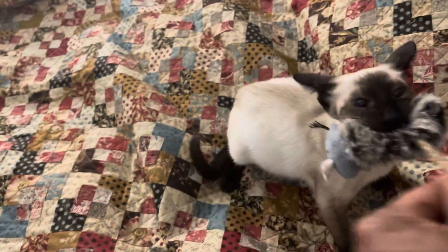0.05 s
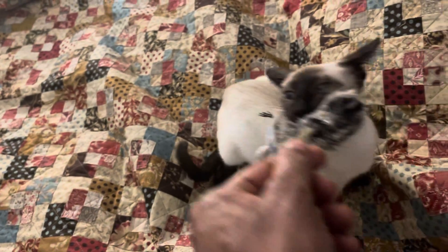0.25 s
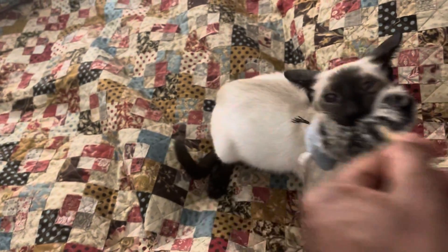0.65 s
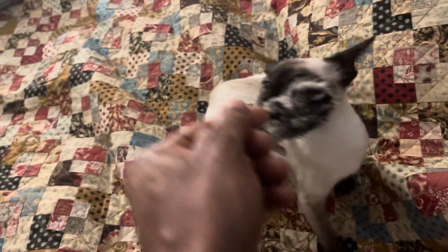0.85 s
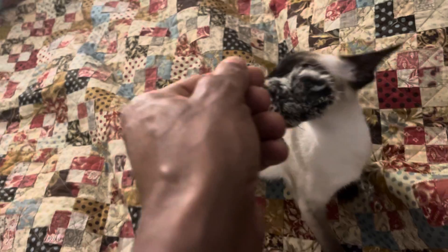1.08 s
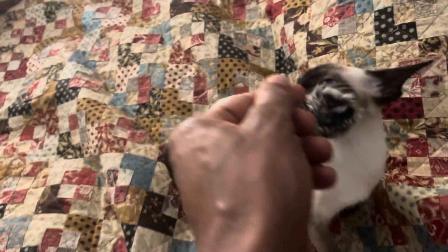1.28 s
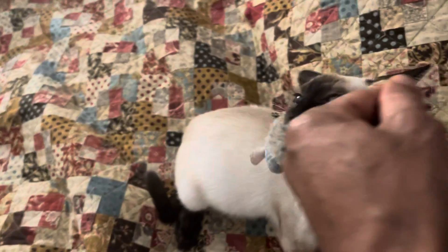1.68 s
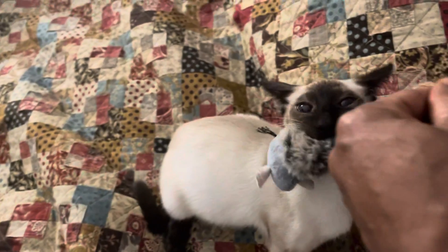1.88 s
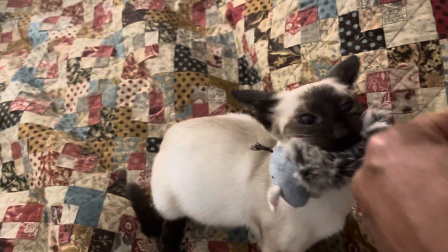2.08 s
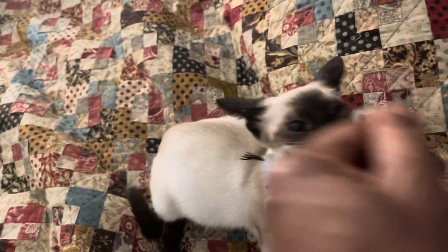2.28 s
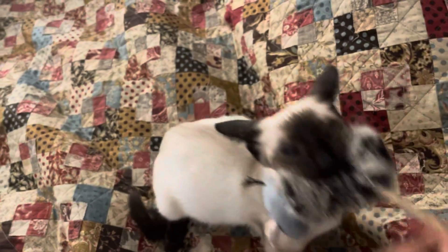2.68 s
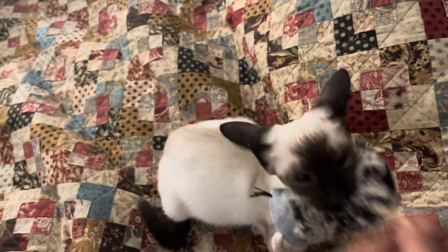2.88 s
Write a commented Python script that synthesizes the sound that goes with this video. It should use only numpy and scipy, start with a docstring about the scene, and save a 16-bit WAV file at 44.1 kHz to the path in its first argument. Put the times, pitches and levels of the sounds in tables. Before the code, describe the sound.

A kitten gives one long, low growl around a plush toy in its mouth. The raspy hum starts unevenly, holds, then sinks and creaks out, close to the microphone in a quiet room.

```python
"""A kitten growls once, long and low, with a plush toy in its mouth, on a quilt in a quiet room.
Its vocal folds give a two-tone hum and a rasp of pulses; a second slap wanders within each cycle.
Halfway the throat changes shape and the second harmonic takes over, with a wet crackle.
The growl starts and ends in uneven, creaky pulses, and the toy's fur brushes past.
A stereo microphone sits close by, with faint room tone and a low rumble behind the kitten."""
import sys
import numpy as np
from scipy import signal
from scipy.fft import rfft, irfft
from scipy.io import wavfile
from scipy.ndimage import uniform_filter1d

SR = 44100
rng = np.random.default_rng(int(sys.argv[2]) if len(sys.argv) > 2 else 0)


def generate_wav(signal):
    """Clip the signal to [-1, 1] and save it as 16-bit WAV at the path in sys.argv[1]."""
    frames = np.transpose(np.atleast_2d(signal))
    scaled = np.clip(frames, -1, 1) * 32767
    pcm = np.round(scaled).astype(np.int16)
    wavfile.write(sys.argv[1], SR, pcm)


N = 134505
T = np.arange(N) / SR
FREQS_HZ = np.fft.rfftfreq(N, 1 / SR)


def amp(db):
    """Decibels to gain."""
    return 10 ** (np.asarray(db) / 20)


def unit_rms(x):
    """Scales to rms 1."""
    return x / np.sqrt(np.mean(x ** 2) + 1e-20)


def steadied(x, window=3000):
    """Scales to a running rms of 1."""
    power = uniform_filter1d(uniform_filter1d(x ** 2, window), window)
    return x / np.sqrt(abs(power) + 1e-14)


def curve(table, column=1):
    """One column of a time table at every sample."""
    rows = np.array(table, float)
    return np.interp(T, rows[:, 0], rows[:, column])


def spectrum_at(table, hz):
    """Reads a spectrum table on a log-frequency axis."""
    table_hz, value = np.transpose(table)
    return np.interp(np.log(hz + 1), np.log(table_hz + 1), value)


def drift(rate_hz):
    """Slow random motion of rms 1."""
    return unit_rms(irfft(rfft(rng.standard_normal(N)) / (1 + (FREQS_HZ / rate_hz) ** 4), N))


def colour(x, table, size=4096):
    """Minimum-phase filter with the given spectrum."""
    log_gain = np.log(amp(spectrum_at(table, abs(np.fft.fftfreq(size, 1 / SR)))))
    taps = np.fft.ifft(np.exp(np.conj(signal.hilbert(log_gain)))).real
    return signal.oaconvolve(x, taps[:size // 2])[:N]


def resonate(x, hz, width_hz):
    """A steep resonance of gain 1 whose centre may glide."""
    carrier = np.exp(2j * np.pi * np.cumsum(hz * np.ones(N)) / SR)
    pole = np.exp(-np.pi * width_hz / SR)
    baseband = signal.lfilter([(1 - pole) ** 2], [1, -2 * pole, pole * pole], x / carrier + 1e-18)
    return 2 * (carrier * baseband).real


def pulses(cycles, jitter_s, spread_db):
    """One click per cycle, scattered in time and strength."""
    at = np.flatnonzero(np.diff(np.floor(cycles)) > 0)
    late, strength = rng.standard_normal((600, 2))[:len(at)].T
    place = np.clip(at + late * (jitter_s * np.ones(N))[at] * SR, 0, N - 1).astype(int)
    level_db = np.clip(strength, -2, 2) * (spread_db * np.ones(N))[at]
    return np.bincount(place, amp(level_db), N)


# Room tone at the microphone: freq_hz, relative_db
ROOM_TONE = [(20,-39),(33,-26.5),(50,-2),(70,7),(100,-2),(250,-9.5),(450,-14),(900,-20),(2000,-26.5),(2800,-30.5),(6000,-34),(9000,-31.5),(11500,-36),(16000,-48.5)]
# Likeness of its left and right sides: freq_hz, correlation
ROOM_TONE_LIKENESS = [(50,.85),(300,0.68),(1000,0.14),(4000,0.7),(10000,0.047)]
# Low rumble in the room: time_s, level_db
RUMBLE_LEVEL = [(0,-83),(0.3,-70.5),(1.5,-66),(2.6,-76.5),(3.05,-81.5)]

def room_tone():
    """The quiet room all around the microphone; a low rumble swells and sinks in the centre."""
    left, unrelated = rfft(rng.standard_normal((2, N)))
    likeness = spectrum_at(ROOM_TONE_LIKENESS, FREQS_HZ)
    right = likeness * left + np.sqrt(1 - likeness ** 2) * unrelated
    air = irfft(np.array([left, right]) * amp(spectrum_at(ROOM_TONE, FREQS_HZ)), N)
    rumble = unit_rms(resonate(rng.standard_normal(N), hz=57.7, width_hz=22))
    return amp(-71) * unit_rms(air) + amp(curve(RUMBLE_LEVEL)) * rumble


# Decay of the room around the quilt: freq_hz, t60_s
ROOM_DECAY = [(150,0.061),(1000,0.1),(8000,0.041)]

def room_tail(x):
    """The room returns a short, soft tail with little bass, different on each side."""
    hz, age, noise = signal.stft(rng.standard_normal((2, 16384)), SR, nperseg=256)
    fade = amp(-60 * age / spectrum_at(ROOM_DECAY, hz)[:, None])
    rise = np.minimum(age / 0.012, 1)
    tail = signal.istft(noise * fade * rise, SR, nperseg=256)[1]
    wet = signal.fftconvolve(x[None], tail / np.linalg.norm(tail[0]), axes=1)[:, :N]
    return amp(-14) * signal.lfilter(*signal.butter(2, 260, "high", fs=SR), wet)


# Balance at the microphone: freq_hz, left_minus_right_db
MIC_BALANCE = [(60,-.4),(140,-.6),(260,0),(650,.5),(780,-.7),(1000,-4),(1350,-2.5),(1700,-4),(2100,-3.8),(2600,0),(4200,2.8),(6000,.3),(12000,0)]
# Phase between its ports: freq_hz, left_lead_rad
MIC_PHASE = [(60,0),(140,-.07),(260,-.22),(550,-.3),(820,-.55),(1200,-.2),(1480,-.45),(2000,0),(2500,.7),(3300,1.2),(4300,.7),(5300,.8),(6300,.5),(8600,.1),(9700,-2.2),(11000,-2.2)]

def microphone(x):
    """Two ports close to the kitten hear it with small level and phase differences."""
    left = amp(spectrum_at(MIC_BALANCE, FREQS_HZ) / 2) * np.exp(.5j * spectrum_at(MIC_PHASE, FREQS_HZ))
    return irfft(rfft(x) * np.array([left, 1 / left]), N)


# Touches of the plush toy: peak_s, length_s, centre_hz, level_db
FUR_STROKES = [(.79,.06,9100,-93),(1.58,.012,9100,-88),(1.69,.05,9100,-84),(2.89,.05,2000,-89),(2.975,.025,3900,-89),(3.02,.03,2000,-90)]

def toy_fur():
    """The toy's fur brushes past in soft swells of hiss, each in its own band."""
    out = np.zeros(N)
    for peak_s, length_s, hz, db in FUR_STROKES:
        swell = amp(db) * np.exp(-(2 * (T - peak_s) / length_s) ** 2)
        out += swell * unit_rms(resonate(rng.standard_normal(N), hz, width_hz=2200))
    return out


# Wet crackle in the mouth: time_s, level_db
SALIVA_LEVEL = [(0.19,-100),(0.65,-88),(1.0,-102),(1.53,-93),(1.58,-74),(1.62,-88),(1.69,-76),(1.73,-84),(1.78,-77.5),(1.89,-88),(1.97,-77),(2.03,-82),(2.15,-80),(2.3,-88),(2.8,-104)]

def saliva(cycles, puffs):
    """Saliva ticks in time with the folds."""
    drive = unit_rms(pulses(cycles, jitter_s=0.00032, spread_db=6)) + 0.33 * puffs
    ticks = 0.47 * resonate(drive, 9230, 700) + resonate(drive, 11170, 450)
    return amp(curve(SALIVA_LEVEL)) * steadied(ticks)


# Movement of the throat: time_s, second_shape_share, top_resonance_hz
THROAT_MOTION = [(0.2,0,5620),(0.5,0,5420),(1.15,0,5340),(1.45,1,5600),(1.7,1,5870),(2.25,0.99,5833),(2.45,0.6,5504),(2.8,0.18,6150)]
# Its first and second shape: freq_hz, gain_db
FIRST_SHAPE = [(60,-22),(200,-18.5),(300,-12.5),(420,-8),(480,-2.5),(570,-1.5),(710,3),(860,-2),(940,-12),(1020,-6.5),(1160,-3),(1420,-3),(1720,-12.5),(1950,-11),(2250,-26),(3000,-25.5),(6000,-92.5)]
SECOND_SHAPE = [(60,-13),(200,-7.5),(370,5),(470,-7),(630,-.5),(760,5),(870,-3),(950,-9.5),(1040,-7),(1190,-2),(1280,-5),(1420,-10),(1850,-12.5),(2080,-11.5),(2350,-42.5),(3000,-63.5),(6000,-66.5)]
# Resonance added by the mouth: time_s, centre_hz, gain_db
MOUTH_BAND = [(0.2,1850,4),(0.35,1630,-13),(.5,1700,-17),(0.62,1720,0.5),(0.8,1780,0),(1.0,1750,1.5),(1.17,1702,2.5),(1.27,1771,3.5),(1.42,1930,3.5),(1.6,1870,-2),(1.8,1933,0.5),(2.1,1850,-1),(2.3,1860,1),(2.42,1735,0.5),(2.6,1624,-4),(2.8,1825,-3)]

def throat(drive):
    """The throat moves between two shapes, and the mouth lifts one gliding band."""
    share = curve(THROAT_MOTION)
    voice = (1 - share) * colour(drive, FIRST_SHAPE) + share * colour(drive, SECOND_SHAPE)
    return voice + amp(curve(MOUTH_BAND, 2)) * resonate(voice, curve(MOUTH_BAND), width_hz=358)


# Gliding resonance of the nose: time_s, centre_hz, level_db
NASAL_BAND = [(0.19,2900,-85),(0.31,2800,-76),(0.35,2850,-89),(0.44,2780,-86),(0.55,2900,-72.5),(0.6,2800,-80),(0.69,2900,-72.5),(0.75,2870,-76),(0.82,2780,-73.5),(1.05,2680,-85),(1.17,2560,-78),(1.35,2740,-74),(1.55,2790,-75),(1.9,2713,-82),(2.2,2707,-85.5),(2.4,2650,-79),(2.5,2600,-91),(2.6,2570,-83),(2.85,2496,-98)]
# Its steady resonances near 4 kHz: centre_hz, width_hz, relative_db
NOSE_MODES = [(3750,650,-5.5),(4210,750,-5)]
# Those two together: time_s, level_db
NOSE_LEVEL = [(0.19, -90), (0.2, -81), (0.39, -87), (0.54, -76), (0.6, -79), (0.69, -76), (0.74, -83),
              (0.77, -74), (1.05, -84), (1.14, -78), (1.2, -82.5), (1.34, -76), (1.35, -82), (1.43, -75.5),
              (2.07, -78.5), (2.27, -86.5), (2.31, -76), (2.36, -87), (2.4, -76), (2.47, -92),
              (2.69, -87.5), (2.85, -103)]
# Top resonance of the throat: time_s, level_db
TOP_BAND_LEVEL = [(.19,-82),(.22,-78),(.28,-80),(.33,-85),(.46,-89),(.5,-77.5),(.66,-77.5),(.73,-83),(.79,-74.5),(.87,-76),(.96,-82),(1.08,-84),(1.14,-78.5),(1.22,-85),(1.42,-83),(1.6,-76.5),(1.76,-74),(1.9,-80),(2.08,-78.5),(2.23,-90),(2.36,-78.5),(2.46,-79.5),(2.52,-92),(2.57,-87),(2.65,-93),(2.85,-101)]

def buzz(cycles, puffs):
    """Uneven ticks and hiss ring the upper resonances of nose and throat."""
    spread_db = np.interp(curve(THROAT_MOTION), [0, 1], [2.5, 4.8])
    drive = steadied(pulses(cycles, .0001, spread_db)) + amp(-4) * puffs
    nasal = resonate(drive + .5 * puffs, curve(NASAL_BAND), width_hz=650)
    nose = sum(amp(db) * resonate(drive, hz, width) for hz, width, db in NOSE_MODES)
    top = resonate(drive, curve(THROAT_MOTION, 2), width_hz=540)
    bands = [(nasal, curve(NASAL_BAND, 2)), (nose, curve(NOSE_LEVEL)), (top, curve(TOP_BAND_LEVEL))]
    return sum(amp(db) * steadied(band, window=1500) for band, db in bands)


# Hard slaps of the folds as the growl catches and creaks out: start_s, slap_peak_db, chest_peak_db
HARD_SLAPS = [(.191,-54,-50),(.246,-53,-54),(.277,-48,-54),(2.647,-51,-54),(2.673,-50,-55),(2.691,-49,-53),(2.729,-50,-51),(2.750,-48,-51),(2.778,-54.5,-51),(2.803,-58,-51),(2.828,-66,-58)]

def creaks():
    """Each hard slap is a click and a short puff through the throat, and a low knock in the chest."""
    puff_decay_s = 0.0015
    chest_hz, chest_rise_s, chest_decay_s = 228, .002, .010
    out = np.zeros(N)
    for start_s, slap_db, chest_db in HARD_SLAPS:
        age = np.maximum(T - start_s, 0)
        drive = amp(-13.5) * rng.standard_normal(N) * (T >= start_s) * np.exp(-age / puff_decay_s)
        drive[round(start_s * SR)] -= 1  # the click
        slap = throat(drive)
        envelope = (1 - np.exp(-age / chest_rise_s)) * np.exp(-age / chest_decay_s)
        knock = np.sin(2 * np.pi * chest_hz * age) * envelope
        out += amp(slap_db) * slap / abs(slap).max() - amp(chest_db) * knock / abs(knock).max()
    return out


# Rasp of the folds, close up: time_s, level_db
RASP_LEVEL = [(0.19,-66),(0.205,-60.5),(0.225,-70),(0.265,-66),(0.29,-63),(0.4,-59),(0.52,-57),(0.66,-51.5),(0.74,-55.5),(0.81,-51.5),(0.9,-52),(0.97,-54.5),(1.07,-53.5),(1.18,-52),(1.35,-52.5),(1.55,-52.5),(1.92,-53.5),(2.19,-58.5),(2.27,-55),(2.52,-59.5),(2.6,-56.5),(2.66,-62),(2.7,-65.5),(2.73,-66),(2.79,-68),(2.85,-86)]
# Second slap after each closure: time_s, delay_cycles, relative_strength
SECOND_SLAP = [(0.28,0.2,0.3),(0.45,0.27,0.66),(0.54,0.34,0.28),(0.63,0.452,0.3),(0.77,0.28,0.7),(0.84,0.43,0.55),(0.9,0.56,0.62),(1.0,0.46,0.54),(1.1,0.38,0.88),(1.19,0.53,0.4),(1.3,0.37,0.37),(1.43,0.38,0.26),(1.52,0.481,0.25),(1.8,.38,0.41),(2.2,0.33,0.42),(2.35,0.43,0.5),(2.47,0.33,0.15),(2.6,0.47,0.5),(2.7,0.29,0.2)]

def rasp(cycles, uneven, puffs):
    """Closing folds, their second slap and puffs of air ring the throat."""
    jitter_s = 0.00045 * uneven
    slaps = curve(SECOND_SLAP, 2) * pulses(cycles - curve(SECOND_SLAP), 2.56 * jitter_s, spread_db=0)
    closures = pulses(cycles, jitter_s, spread_db=4 * uneven)
    breath = amp(-13.5) * (0.56 + uneven) * puffs
    voice = throat(breath - unit_rms(closures + slaps))
    reflection = amp(-13.5) * np.interp(T - 0.001807, T, voice)  # off something close
    return amp(curve(RASP_LEVEL)) * steadied(voice + reflection)


# Hum of the folds, close up: time_s, fundamental_db, second_harmonic_db
HUM_LEVELS = [(0.19, -57, -58), (0.2, -51.5, -60), (0.26, -53.5, -51.5), (0.34, -49, -58),
              (0.43, -48.5, -54.5), (0.54, -48, -57.5), (0.6, -45, -54), (1.11, -44.5, -52.5),
              (1.2, -43.5, -49), (1.32, -48, -49.5), (1.53, -52.5, -43.5), (1.81, -50.5, -45.5),
              (2.0, -58.5, -45), (2.12, -52, -47), (2.19, -56, -50.5), (2.29, -54, -44.5),
              (2.32, -60.5, -45.5), (2.43, -53, -49), (2.635, -59, -48), (2.66, -59, -53),
              (2.72, -61, -61.5), (2.8, -72, -57.5), (2.85, -60, -72)]

def hum(cycles, rough):
    """The folds' two lowest harmonics flutter with roughness, over a faint half tone and a low burr."""
    first, second = amp(curve(HUM_LEVELS)), amp(curve(HUM_LEVELS, 2))
    angle = 2 * np.pi * cycles
    flutter = 0.32 * rough
    tones = first * np.cos(angle) * (1 + flutter * drift(45))
    tones += second * np.cos(2 * angle + 2 * np.pi * 0.11) * (1 + flutter * drift(41))
    half_tone = (np.cos(angle / 2) + 0.93 * np.cos(1.5 * angle)) * drift(8)
    burr = unit_rms(resonate(rng.standard_normal(N), hz=196, width_hz=180))
    grit = amp(-18.5) * np.sqrt(rough) * half_tone + amp(-4) * rough * burr
    return np.sqrt(2) * tones / np.sqrt(1 + flutter ** 2) + np.hypot(first, second) * grit


# Vibration of the kitten's vocal folds: time_s, pitch_hz
FOLD_PITCH = [(.19,134.2),(.24,126.7),(.28,135.1),(.38,136.2),(.4,140),(.44,137),(.46,140.8),(.5,133.9),(.56,141.6),(.59,142.5),(.67,135.8),
              (.71,144.4),(.75,146.1),(.86,148.1),(.92,140.4),(.98,145.5),(1.07,148.1),(1.23,137.6),(1.28,138),(1.4,128.8),(1.44,131),
              (1.61,126.6),(1.63,130.6),(1.67,131.4),(1.69,125.3),(1.75,126.8),(1.93,121.3),(1.96,124.5),(2.01,118),(2.04,119),(2.14,113.5),
              (2.23,121.4),(2.26,119),(2.34,121.3),(2.38,129.4),(2.42,126.9),(2.47,131.6),(2.64,121.3),(2.7,107.7),(2.77,77.95),(2.85,75.7)]
# Their irregularity, from 0 to 1: time_s, hum_roughness, pulse_unevenness
FOLD_ROUGHNESS = [(.19,.5,.5),(.27,.4,.35),(.33,.18,.2),(.48,.36,.3),(.58,.08,.07),(.68,.14,.1),(.73,.42,.25),(.8,.16,.08),(.88,.12,.07),(.94,.26,.14),(1.03,.12,.07),(1.16,.14,.13),(1.34,.26,.27),(1.48,.16,.11),(1.68,.27,.21),(1.85,.2,.15),(1.9,.25,.27),(1.96,.2,.12),(2.13,.22,.2),(2.16,.65,.55),(2.2,.22,.22),(2.62,.25,.24),(2.68,.9,.8),(2.85,.9,.9)]

def growl():
    """One train of fold cycles drives hum, rasp, buzz and saliva; each closure starts a puff of air."""
    start_s, end_s, attack_s, release_s = .187, 2.85, 0.0069, 0.021
    leak, puff_decay_cycles = .3, .45
    rough, uneven = curve(FOLD_ROUGHNESS), curve(FOLD_ROUGHNESS, 2)
    pitch_hz = curve(FOLD_PITCH) * (1 + .04 * uneven * drift(35))
    cycles = np.cumsum(pitch_hz) / SR
    closure = cycles - .52  # the folds close just past mid-cycle
    airflow = leak + np.exp(-(closure % 1) / puff_decay_cycles)
    puffs = unit_rms(airflow * rng.standard_normal(N))
    gate = np.clip((T - start_s) / attack_s, 0, 1) * np.clip((end_s - T) / release_s, 0, 1)
    voice = hum(cycles, rough) + rasp(closure, uneven, puffs)
    return gate * (voice + buzz(closure, puffs) + saliva(closure, puffs))


def scene():
    """The kitten and its toy close to the microphone, the quiet room behind."""
    kitten = growl() + creaks() + toy_fur()
    return microphone(kitten) + room_tail(kitten) + room_tone()


def record(dry):
    """The recorder passes 38 Hz to 12.2 kHz."""
    low_cut = signal.butter(4, 38, "high", fs=SR, output="sos")
    high_cut = signal.firwin(301, 12200, window=("kaiser", 8), fs=SR)
    return signal.oaconvolve(signal.sosfilt(low_cut, dry), high_cut[None], "same")


dry = scene()
out = record(dry)
generate_wav(out)
```